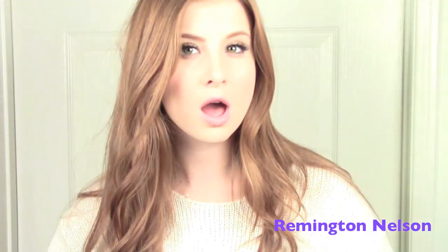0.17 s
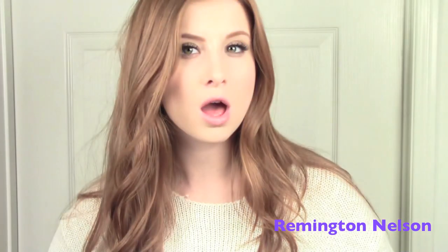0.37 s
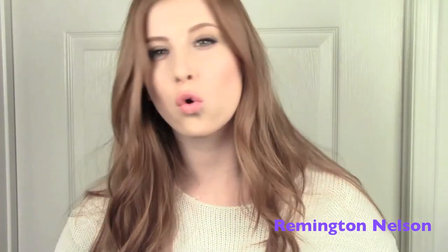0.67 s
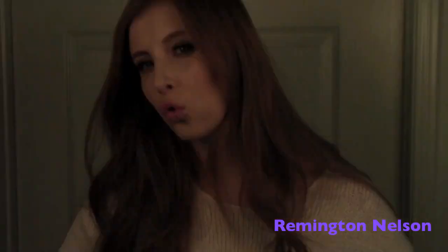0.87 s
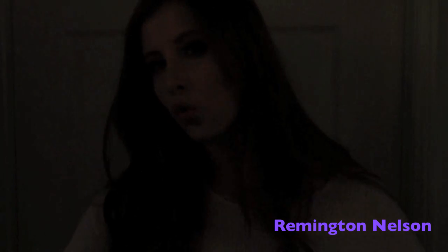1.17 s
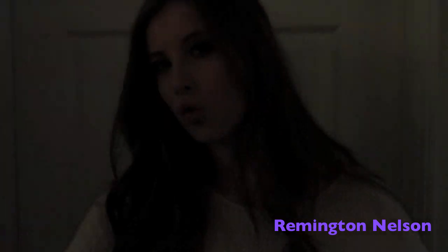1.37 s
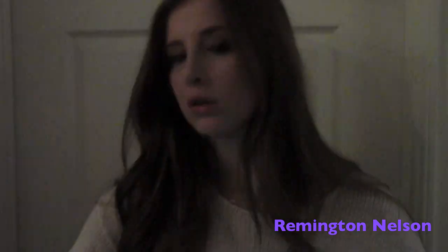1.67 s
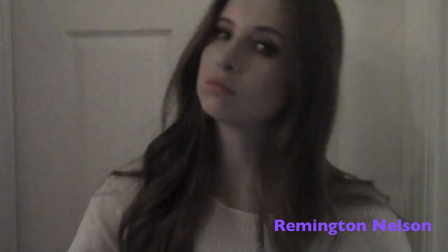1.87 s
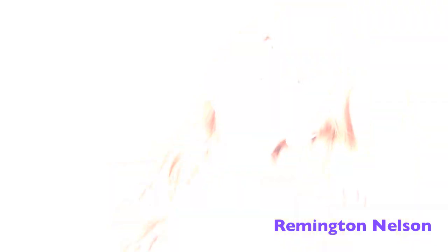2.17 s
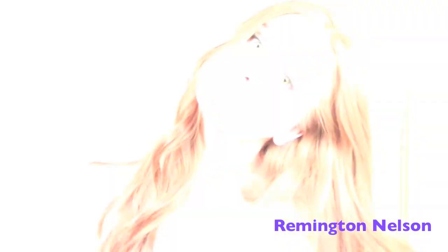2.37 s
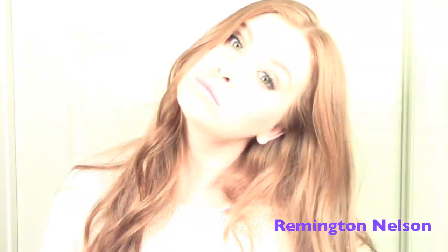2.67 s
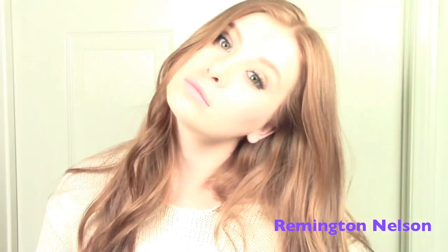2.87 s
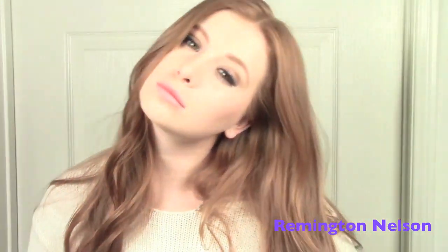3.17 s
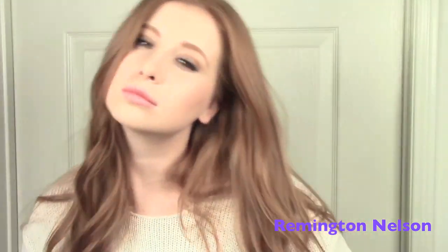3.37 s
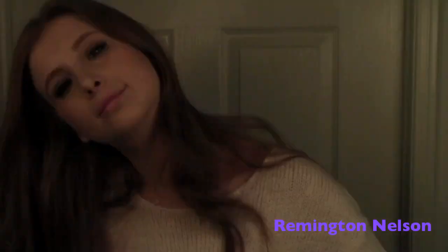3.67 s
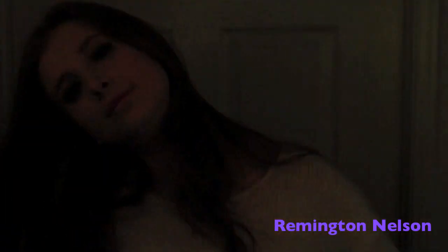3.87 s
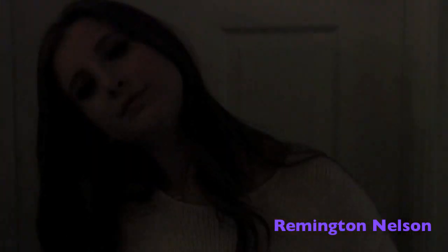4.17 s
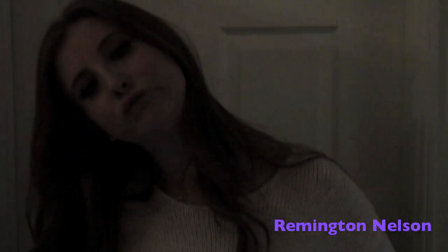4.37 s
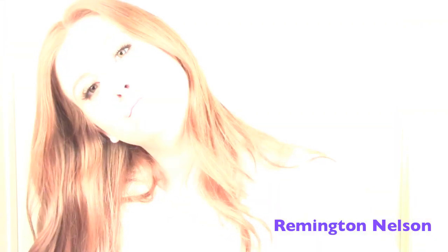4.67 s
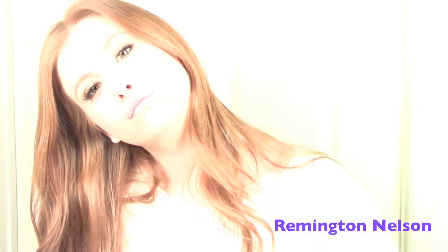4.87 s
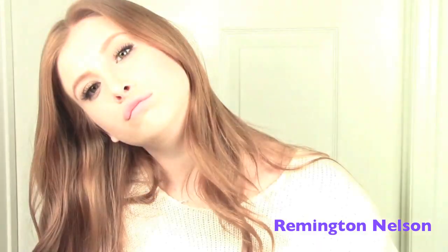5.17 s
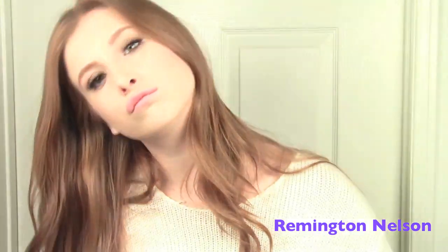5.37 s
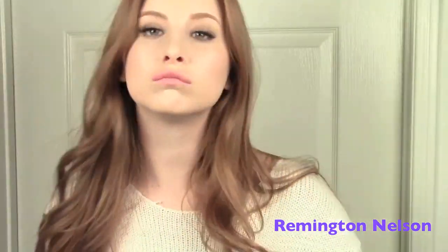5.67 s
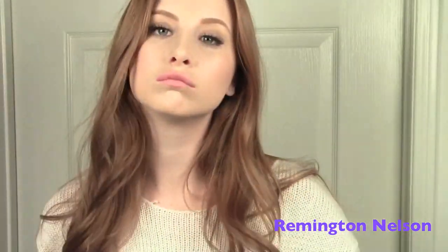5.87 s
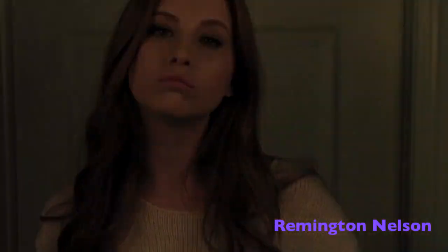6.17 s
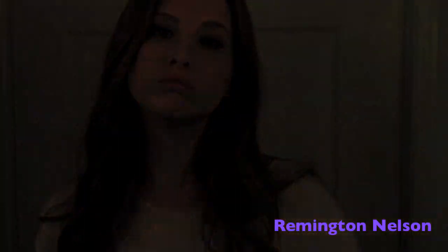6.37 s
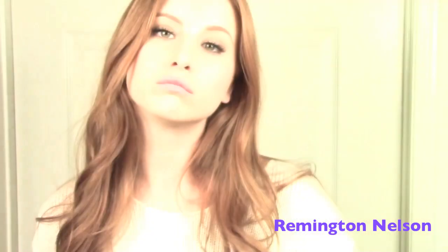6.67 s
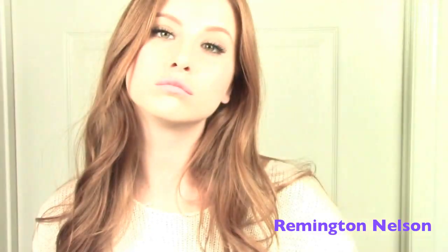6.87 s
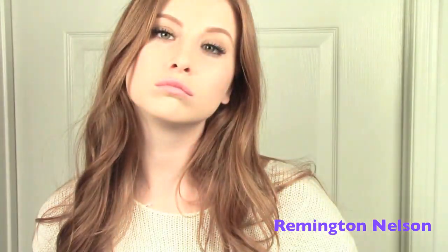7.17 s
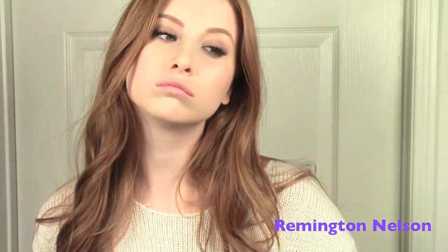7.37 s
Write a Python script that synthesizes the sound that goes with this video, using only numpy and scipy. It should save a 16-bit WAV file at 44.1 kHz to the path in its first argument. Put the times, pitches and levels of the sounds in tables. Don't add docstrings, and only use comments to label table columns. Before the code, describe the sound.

Wall light switches snap off and on three times at uneven intervals, loud and close in a small hard room over low ventilation rumble.

```python
import sys
import numpy as np
from scipy import signal
from scipy.io import wavfile
from scipy.ndimage import uniform_filter1d, minimum_filter1d

SR = 44100
rng = np.random.default_rng(int(sys.argv[2]) if len(sys.argv) > 2 else 0)


def gain_from_db(level_db):
    decades = np.asarray(level_db, float) / 20
    return 10 ** decades


def dump(signal):
    limited = np.clip(np.atleast_2d(signal).T, -1, 1)
    pcm = np.round(limited * 32767).astype(np.int16)
    wavfile.write(sys.argv[1], SR, pcm)


N = 331609

# (frequency [Hz], level [dB per Hz])
AIR_SPECTRUM = [(8.8, -44.5), (15, -15), (75, -2), (198, -6), (355, -13), (430, -17.5), (1450, -27),
                (15100, -42.5)]
# (frequency [Hz], left-right likeness [0-1])
AIR_LIKENESS = [(60, 0.74), (130, 0.88), (290, 0.5), (640, 0.13), (1410, 0.35), (3100, 0.67), (6820, 0.81),
                (15000, 0.38)]
# (frequency [Hz], left minus right [dB])
AIR_BALANCE = [(60, -2.5), (240, -1), (950, -2), (3770, -1.5), (15000, -0.5)]
# (frequency [Hz], width [Hz], level [dB])
FAN_LINES = [(83.1, 13, -55.5), (120.84, 9.8, -51.5), (153.5, 6.7, -59.5), (202.3, 12, -56),
             (235.8, 6.2, -59.5), (355.4, 26, -62)]
AIR_DB = -45
HISS_EDGE_HZ = 15300

# (time [s], level [dB])
MOTOR_LEVEL = [(0, -70), (0.999, -65), (2, -66), (2.4, -89.5), (3.4, -81.5), (3.9, -63.5), (6, -67.5),
               (7.6, -66)]
# (frequency [Hz], width [Hz], level [dB])
BARREL_RINGS = [(1685, 130, 0), (2220, 260, -1)]
STEP_HZ, WOBBLE_HZ = 60, 26.6

# (time of the snap [s], level [dB], length [s])
SCRAPES = [
    (0.8102, -13, 0.0062),
    (2.0186, -19.5, 0.0064),
    (2.037, -19, .002),
    (3.6029, -18, 0.0054),
    (3.6381, -15, .002),
    (4.524, -28.5, .006),
    (4.557, -20.5, .0015),
    (6.0566, -23, 0.0036),
    (6.548, -18.5, 0.0069),
    (6.5877, -11, 0.0017),
]

# (time [s], peak [dB], broad plate against spring [dB], deep against light rings [dB])
OFF_BLOWS = [(.8105, 0.5, 5, -0.5), (.8119, 1, 0, 1), (.8148, 5, -4, 0.5), (.8188, -13, 2, -4),
             (.8229, -15, 4.5, -4), (3.6037, 3.5, -7.5, 1), (3.6052, 1.5, -2.5, 6), (3.608, -5, 5.5, 2),
             (3.6113, -3, -0.5, 1), (3.6143, -7, -1, -5), (3.6156, -11, 2, -1.5), (3.638, 1, 0.5, 2),
             (3.6391, -4, -1.5, 2), (3.641, -13.5, -4, -1), (6.0572, 0, -5, 0), (6.0586, 1, -7, 2),
             (6.061, -3.5, 6, -1), (6.068, 2, -1, -1), (6.0717, -8.5, 0, -1)]
ON_BLOWS = [(4.5254, 2.5, -6.5, -5), (4.5266, -2.5, 0.5, 2.5), (4.5286, -10, 2.5, 3), (4.534, -12, 0, 3.5),
            (4.5377, -15, 6.5, -2.5), (4.5543, -7, 3.5, 0.5), (6.5479, -0.5, 4.5, -1),
            (6.5495, -7, 2, -0.5), (6.5515, -8, -2, 3), (6.5557, -12.5, 0, -6), (6.558, -14, 8, -4.5),
            (6.5811, -24, 4, -2), (6.5875, -2, -4.5, 0.5), (6.5906, -20, -5, 0)]
OTHER_BLOWS = [
    (2.0186, -0.5, -3, -1.5),
    (2.0199, -3, -4, 0),
    (2.0226, -20, 8, 2.5),
    (2.0273, -16.5, 0.5, 1),
    (2.0418, -5, -3.5, 2.5),
    (2.043, -9.5, 0.5, 1),
    (2.055, -19, -8, 0),
]
# (frequency [Hz], width [Hz], level [dB])
OFF_RINGS = [
    [(684, 570, 2), (1340, 1100, 10.5)],
    [(2400, 120, -6.5), (3100, 720, 8)],
    [(3970, 620, 5.5), (4480, 1200, -2.5)],
    [(5300, 980, -3.5), (6320, 390, 0.5), (7270, 720, 4.5), (8300, 1500, -3)],
    [(9100, 3000, -1.5), (14580, 7900, -4.5)],
]
ON_RINGS = [
    [(760, 480, 0.5), (1200, 320, 0.3)],
    [(2417, 150, -1.5), (3280, 580, -0.5)],
    [(4044, 260, -0.62), (4960, 860, -0.34)],
    [(5420, 1200, 0.5), (6600, 590, 6.5), (7360, 220, -3.5), (8000, 730, 5.5)],
    [(9880, 1900, 2.5), (12000, 1200, -2.5)],
]
OTHER_RINGS = [
    [(771, 580, -1.2), (1200, 370, 0.3)],
    [(2435, 160, -2), (3200, 785, 3)],
    [(3890, 490, -1.5), (4740, 720, 0.51)],
    [(5400, 510, -2), (6490, 690, 0.5), (7500, 900, 0), (8450, 770, -3)],
    [(10870, 1900, 3.4), (12460, 2200, 2.88)],
]
# (thud [dB], low [dB], middle [dB], top [dB])
OFF_COLOUR_DB = (-20.5, -6.5, -4, -7)
ON_COLOUR_DB = (-21.5, -7.5, -6, -7)
OTHER_COLOUR_DB = (-19.5, -7, -4.5, -7)
# (thud, low, middle, top [dB per dB])
PLATE_FOLLOWS = (0.58, .9, 0.91, .4)
# (thud, low, middle, top [dB per dB])
DEPTH_FOLLOWS = (1.3, .9, -.9, 0)
LANDING_PAUSE_S, LANDING_THUD_DB = 0.013, 3

# (frequency [Hz], time to fall 60 dB [s])
ROOM_DECAY = [(500, 0.45), (1200, 0.51), (2500, 0.46), (4000, 0.54), (7000, 0.41), (11000, 0.31),
              (16000, 0.28)]
# (frequency [Hz], level [dB])
ROOM_TINT = [(500, 1), (1500, -2.5), (3000, 1), (6000, -1.5), (10000, 1.5), (15300, 0), (16000, -16)]
# (frequency [Hz], left-right likeness [0-1])
ROOM_LIKENESS = [(600, 0.92), (1500, 1), (3000, 1), (7000, 0.9), (15000, .9)]

# (time [s], level [dB], frequency [Hz], width [Hz], length [s])
KNOCKS = [(1.593, -45.5, 7500, 4490, 0.018), (1.701, -58, 7000, 4000, .002),
          (3.079, -45.5, 5400, 900, 0.0027), (3.169, -36, 1950, 399, 0.028), (3.17, -43, 1270, 250, 0.04),
          (3.17, -44.5, 3333, 350, 0.01), (3.171, -46, 5350, 400, 0.014), (3.172, -50, 7200, 1490, 0.0054),
          (3.339, -48.5, 1968, 500, 0.031), (3.354, -55, 5300, 600, .008), (4.057, -45.5, 1890, 400, 0.042),
          (4.094, -43, 3200, 1200, .003), (4.097, -45.5, 7000, 3500, .006),
          (4.2263, -44.5, 5550, 700, .003), (4.2264, -45, 8300, 2200, .002)]


def evened(x):
    return x / np.sqrt(np.mean(x ** 2) + 1e-20)


def read(points, hz):
    f, value = np.transpose(points)
    return np.interp(np.log(hz + 1), np.log(f + 1), value)


def add(mix, s, sound):
    part = mix[round(s * SR):][:len(sound)]
    part += sound[:len(part)]


def resonate(x, hz, width):
    pole = np.exp((2j * np.pi * hz - np.pi * width) / SR)
    return 2 * signal.lfilter([1 - abs(pole)], [1, -pole], x).real


def ring(x, modes):
    total = 0
    for k, (hz, width, db) in enumerate(modes):
        total = total + (-1) ** k * gain_from_db(db) / width * resonate(x, hz, width)
    return total


def pair(frames, hz, likeness):
    a, b, c, d = rng.standard_normal((frames, len(hz), 4)).T
    like = np.clip(read(likeness, hz), 0, 1)[:, None]
    left, other = a + 1j * b, c + 1j * d
    return np.array([left, like * left + np.sqrt(1 - like ** 2) * other])


def air():
    hz = np.fft.rfftfreq(2048, 1 / SR)
    lean_db = read(AIR_BALANCE, hz) * np.array([[.5], [-.5]])
    edge_db = 15 * np.clip((hz - HISS_EDGE_HZ) / 600, 0, 2)
    level_db = read(AIR_SPECTRUM, hz) + lean_db - edge_db
    spectra = pair(N // 512 + 5, hz, AIR_LIKENESS) * gain_from_db(level_db)[:, :, None]
    wash = signal.istft(spectra, nperseg=2048, noverlap=1536)[1][:, :N]
    noise = rng.standard_normal(N)
    fan = np.zeros(N)
    for line_hz, width, db in FAN_LINES:
        fan += gain_from_db(db) * evened(resonate(resonate(noise, line_hz, width), line_hz, width))
    return gain_from_db(AIR_DB) * evened(wash) + fan * gain_from_db(np.array([[-.7], [.7]]))


def lens_motor():
    s = np.arange(1.1 / STEP_HZ, N / SR - .01, 1 / STEP_HZ)
    wobble_db = 4.5 * np.cos(2 * np.pi * WOBBLE_HZ * s + 1.9)
    steps = np.zeros(N)
    steps[(s * SR).astype(int)] = gain_from_db(wobble_db + 1.2 * rng.standard_normal(len(s)))
    rasps = signal.oaconvolve(steps, np.hanning(200), "same") * rng.standard_normal(N)
    level_db = np.interp(np.arange(N) / SR, *np.transpose(MOTOR_LEVEL))
    return gain_from_db(level_db) * evened(ring(rasps, BARREL_RINGS))


def scrapes():
    out = np.zeros(N)
    before_snap = np.arange(600)[::-1] / SR
    for s, db, length in SCRAPES:
        hiss = resonate(resonate(rng.standard_normal(600), 5200, 5000), 6000, 7000)
        swell = np.clip(1 - before_snap / length, 0, 1) ** 3.1
        add(out, s - 600 / SR, gain_from_db(db) * swell * evened(hiss))
    return out


def switch(blows, rings, colour_db, contact_s, chatter_share, widen):
    out, t = np.zeros((3, N)), np.arange(900) / SR
    landing = np.diff(np.transpose(blows)[0], prepend=0) > LANDING_PAUSE_S
    for first_lane, ((s, db, plate_db, depth_db), lands) in enumerate(zip(blows, landing)):
        chatter = chatter_share * rng.standard_normal(len(t)) * np.exp(-t / contact_s)
        hit = chatter + (t == 0)
        follow_db = plate_db * np.array(PLATE_FOLLOWS) + depth_db * np.array(DEPTH_FOLLOWS)
        thud_db, low_db, mid_db, top_db = np.array(colour_db) + follow_db
        shares_db = (thud_db + LANDING_THUD_DB * lands, low_db, mid_db, 0, top_db)
        lane = first_lane
        for share_db, modes in zip(shares_db, rings):
            parts = []
            for k, (hz, width, mode_db) in enumerate(modes):
                parts.append((-1) ** k * ring(hit, [(hz, widen * width, mode_db)]))
            peak = abs(sum(parts)).max()
            for part in parts:
                lane += 1
                add(out[lane % 3], s + .0003, gain_from_db(db + share_db) * part / peak)
    return out


def plates(contact_s, chatter_share, widen):
    off = switch(OFF_BLOWS, OFF_RINGS, OFF_COLOUR_DB, contact_s, chatter_share, widen)
    on = switch(ON_BLOWS, ON_RINGS, ON_COLOUR_DB, contact_s, chatter_share, widen)
    other = switch(OTHER_BLOWS, OTHER_RINGS, OTHER_COLOUR_DB, contact_s, chatter_share, widen)
    return gain_from_db(5) * (off + on + other)


def ports(x, scatter_db):
    taps = rng.standard_normal(120) * np.sin(np.pi * np.arange(120) / 120)
    taps = np.diff(taps, n=2)
    side = gain_from_db(scatter_db) * signal.oaconvolve(x, taps / np.linalg.norm(taps))[:N]
    return x + side * np.array([[1], [-1]])


def room(x, near_db, near_s, far_db):
    hz, t = np.fft.rfftfreq(128, 1 / SR), np.arange(1000) * 32 / SR
    level_db = read(ROOM_TINT, hz)[:, None] - 60 * t / read(ROOM_DECAY, hz)[:, None]
    spectra = pair(len(t), hz, ROOM_LIKENESS) * gain_from_db(level_db)
    far = signal.istft(spectra, nperseg=128, noverlap=96)[1]
    t = np.arange(far.shape[1]) / SR
    far = far / np.linalg.norm(far[0]) * np.clip(t / 0.005, 0, 1)
    near = far * np.exp(-t / near_s)
    answer = gain_from_db(far_db) * far + gain_from_db(near_db) * near / np.linalg.norm(near[0])
    return signal.fftconvolve(x[None], answer, axes=1)[:, :N]


def knocks():
    out, t = np.zeros(N), np.arange(5000) / SR
    for s, db, hz, width, length in KNOCKS:
        puff = rng.standard_normal(len(t)) * np.exp(-t / length)
        body = resonate(resonate(puff, hz, width), hz, 2 * width)
        add(out, s, gain_from_db(db) * body / abs(body).max())
    return out


def scene():
    small = scrapes() + knocks()
    direct = plates(contact_s=0.00077, chatter_share=0.32, widen=1.015).sum(0) + small
    around = plates(contact_s=0.00015, chatter_share=0.18, widen=1.06) + small / np.sqrt(3)
    wet = sum(room(lane, near_db=-14, near_s=0.011, far_db=-11.5) for lane in around)
    lean = gain_from_db(np.array([[-.35], [.35]]))
    return lean * (ports(direct, scatter_db=-7.5) + wet) + air() + lens_motor()


def band_limit(x):
    return signal.sosfilt(signal.butter(12, 17010, fs=SR, output="sos"), x)


def record(dry):
    over_db = np.clip(20 * np.log10(abs(dry).max(0) + 1e-9) + 1.3, 0, 13)
    fall_db = np.arange(N) / SR * 140
    held_db = -minimum_filter1d(-over_db, 900, origin=449)
    duck_db = np.maximum.accumulate(held_db + fall_db) - fall_db
    gain = 1 / gain_from_db(uniform_filter1d(duck_db, 24))
    ducked = 1.089 * np.tanh(dry / 1.065 * gain)
    edge = signal.firwin(255, 16150, window=("kaiser", 8), fs=SR)
    return band_limit(signal.oaconvolve(ducked, edge[None], "same"))


dry = scene()
out = record(dry)
dump(out)
```